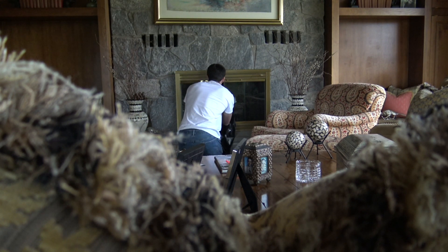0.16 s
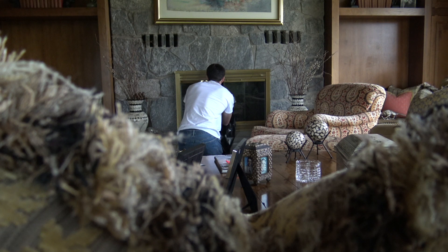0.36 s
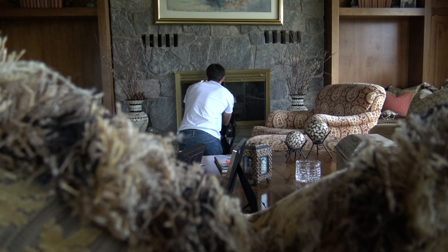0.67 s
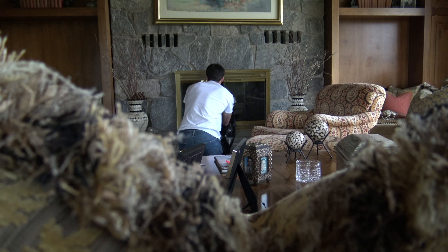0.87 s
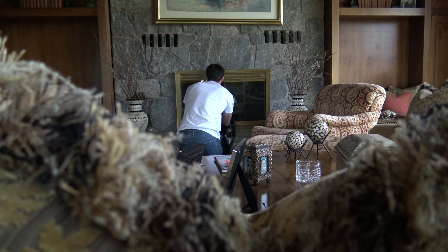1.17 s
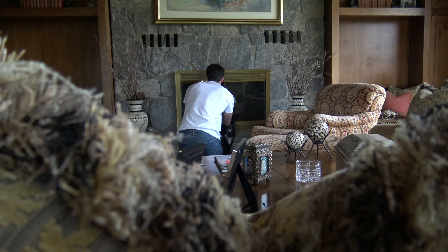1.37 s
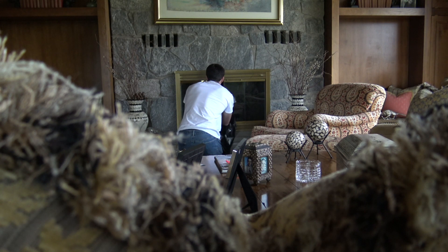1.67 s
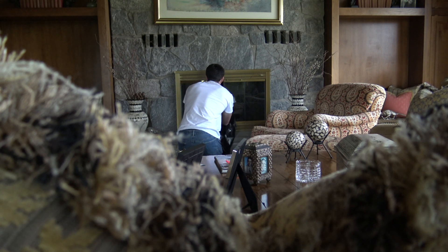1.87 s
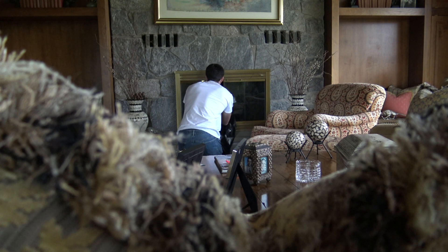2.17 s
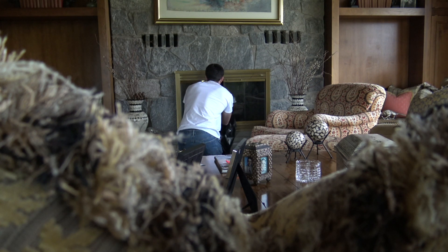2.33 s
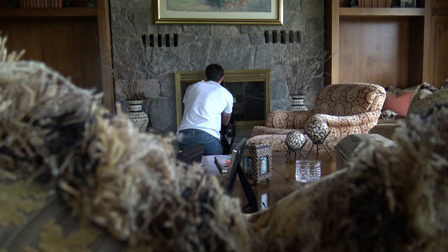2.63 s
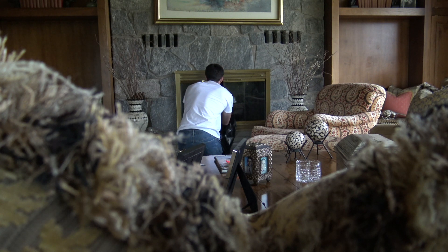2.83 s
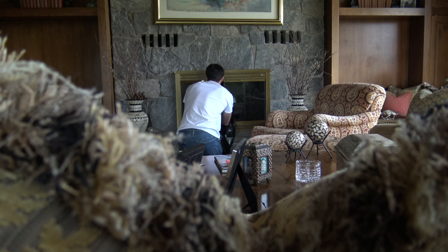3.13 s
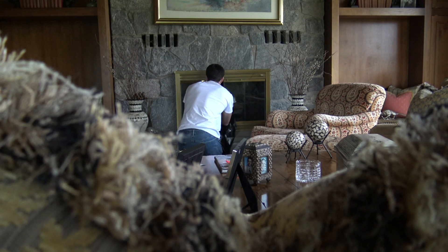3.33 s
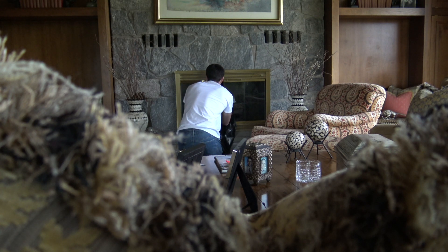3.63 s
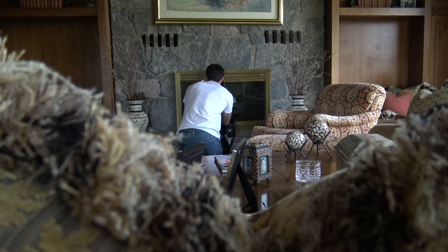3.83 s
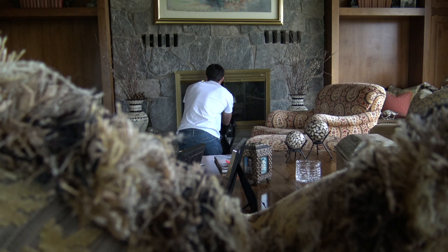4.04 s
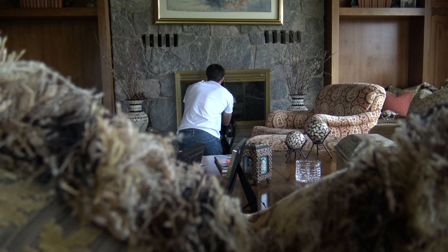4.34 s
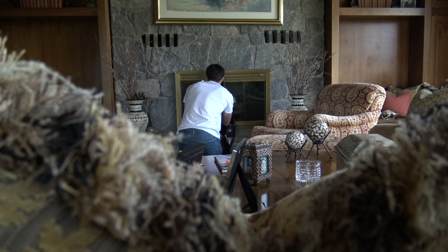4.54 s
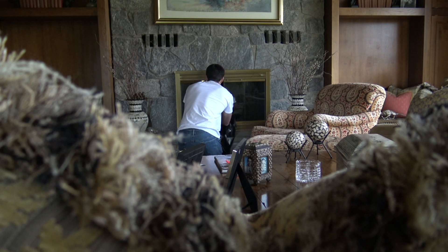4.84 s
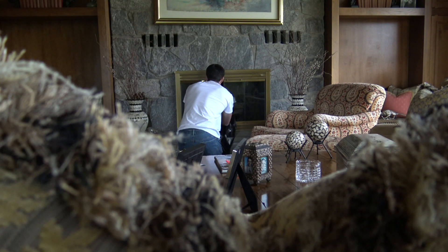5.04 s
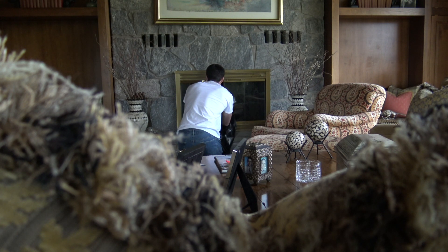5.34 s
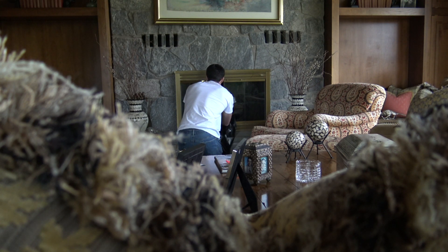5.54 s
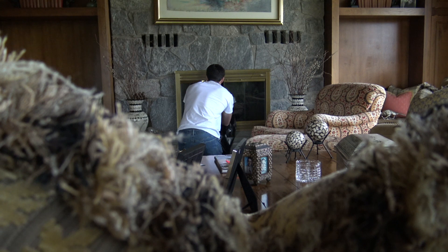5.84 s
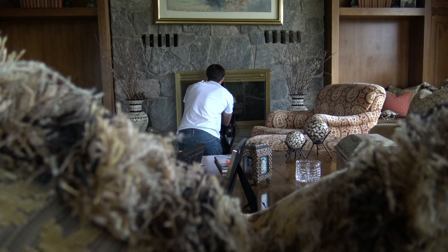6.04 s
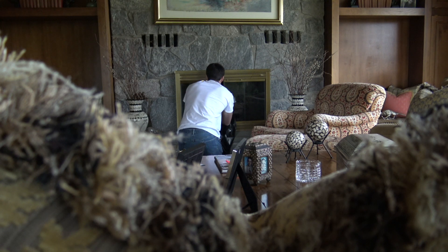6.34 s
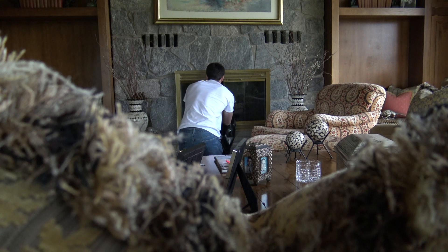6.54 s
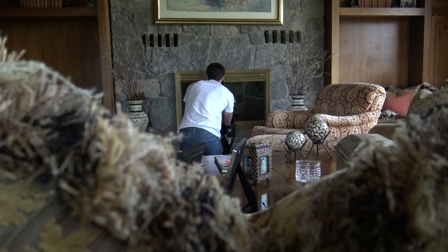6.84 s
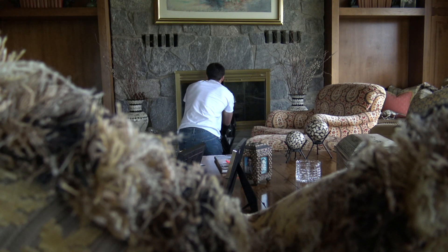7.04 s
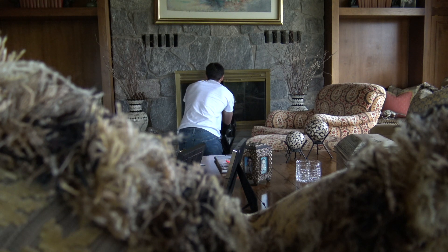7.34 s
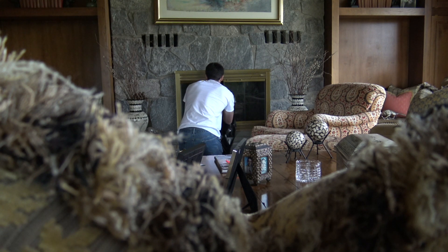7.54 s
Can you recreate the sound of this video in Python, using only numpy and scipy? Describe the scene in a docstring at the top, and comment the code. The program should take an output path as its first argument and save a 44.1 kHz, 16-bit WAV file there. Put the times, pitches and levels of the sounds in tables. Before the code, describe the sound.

Across a hard, echoing living room, someone tugs at the metal-framed glass doors of a fireplace. A short burst of bright clacking slams opens, a longer, harder, fairly regular bout follows, then quiet room hum, and two lighter rattles near the end. Panes ring, frames chatter and the hollow firebox booms beneath. Microphones stand a few meters away.

```python
"""Someone tugs at the metal-framed glass doors of a fireplace, across a live living room.
A short first bout of slams opens over a quiet hum and hiss; a longer, harder bout follows, then two lighter
returns. Each slam is a scatter of metal clicks through steel modes, with ringing panes and a booming firebox.
Before it, rubbing noise swells in the track; around and between slams the panes bump in their frames.
Echoes and a diffuse tail place the doors in the room."""
import sys
import numpy as np
from scipy import signal
from scipy.fft import rfft, irfft, next_fast_len
from scipy.io import wavfile
from scipy.ndimage import uniform_filter1d

SR = 44100
rng = np.random.default_rng(int(sys.argv[2]) if len(sys.argv) > 2 else 0)


def wav_out(sig):
    """Save sig, one row per channel (or a flat mono array), as 16-bit PCM at SR to the path in sys.argv[1]."""
    wavfile.write(sys.argv[1], SR, np.round(np.clip(np.atleast_2d(sig).T, -1, 1) * 32767).astype(np.int16))


N = 339570  # 7.7 s


def amp(db):
    """Decibels to gain."""
    return 10 ** (np.asarray(db) / 20)


def unit(x):
    """Scale to rms 1."""
    return x / np.sqrt(np.mean(x ** 2) + 1e-20)


def norm(x):
    """Scale to energy 1."""
    return x / np.sqrt(np.sum(x ** 2) + 1e-20)


def along(points, hz):
    """Read a curve of (Hz, value) points on a log frequency axis."""
    point_hz, values = np.transpose(points)
    return np.interp(np.log(hz + 1), np.log(point_hz + 1), values)


def filtered(x, response):
    """Shape a sound with a frequency response."""
    n = x.shape[-1]
    padded = next_fast_len(n + SR // 2)
    spectrum = rfft(x, padded) * response(np.fft.rfftfreq(padded, 1 / SR))
    return irfft(spectrum, padded)[..., :n]


def through(x, kernel):
    """Convolve a track with an impulse response."""
    return signal.fftconvolve(x, kernel)[:N]


def add(track, s, sound):
    """Mix a sound into a track at time s, in seconds."""
    start = min(max(round(s * SR), 0), len(track))
    track[start:start + len(sound)] += sound[:len(track) - start]


# Steady room tone. Each row: frequency in Hz, relative density in dB per Hz.
AIR_SPECTRUM = [(25, -5), (60, 0), (100, -0.5), (150, -5), (215, -3), (280, -5.5), (380, -8), (520, -12),
                (720, -15.5), (930, -7), (1150, -10), (1500, -21), (4000, -24.5), (16000, -28)]
# Side share of the room tone. Each row: frequency in Hz, side level against the middle in dB.
AIR_SIDE = [(60, -24.5), (200, -10.5), (1300, -14), (10000, -15)]
AIR_DB = -57.5  # rms of the middle signal, dB re full scale


def room_tone():
    """Steady ventilation and hiss: shaped noise, nearly alike on both sides."""
    noise = rng.standard_normal((2, N))
    mid, side = unit(filtered(noise, lambda hz: amp(along(AIR_SPECTRUM, hz))))
    side = filtered(side, lambda hz: amp(along(AIR_SIDE, hz)))
    return amp(AIR_DB) * np.array([mid + side, mid - side])


# How long the room rings on. Each row: frequency in Hz, time to fall by 60 dB in seconds.
ROOM_DECAY = [(50, 1.6), (160, 1), (420, 0.68), (1100, 0.75), (3000, 0.65), (7000, 0.77), (14000, 0.65)]
# Direct path, floor bounce and first echoes. Each row: delay in seconds, relative gain.
EARLY_ECHOES = [(0, .8), (.0034, .45), (.0078, 1.1), (.0096, .8), (.0142, .9), (.0167, .6), (.0205, .45)]


def room(x, tail_db, build_s, count=5):
    """Hard echoes from stone and shelves, then a diffuse tail that builds up and dies band by band."""
    hz, t, bands = signal.stft(rng.standard_normal((count, SR)), SR, nperseg=256)
    decay = amp(-60 * t / along(ROOM_DECAY, hz)[:, None])
    build = 1 - np.exp(-t / build_s)
    tails = signal.istft(bands * decay * build, SR, nperseg=256)[1]
    # the tail starts only once the sound has reached the nearest wall
    tails = np.pad(tails, ((0, 0), (round(.004 * SR), 0)))
    # every 2 ms the contacts land on a random spot of the doors, with its own paths through the room
    spot = rng.integers(count, size=N)[np.arange(N) // round(.002 * SR)]
    diffuse = sum(through(x * (spot == k), norm(tail)) for k, tail in enumerate(tails))
    early = np.zeros(SR // 20)
    for s, gain in EARLY_ECHOES:
        add(early, s, np.array([gain]))
    return (through(x, norm(early)) + amp(tail_db) * diffuse) / np.hypot(1, amp(tail_db))


def ring(modes):
    """Impulse response of damped modes: wider ones die faster, and dB sets the height of each peak."""
    t = np.arange(SR // 2) / SR
    total = np.zeros(len(t))
    for k, (hz, width, db) in enumerate(modes):
        decay = np.exp(-np.pi * width * t)
        total += (-1) ** k * amp(db) * width * decay * np.cos(2 * np.pi * hz * t)
    return norm(total)


def click(spectrum, tilt_db, smear, size=2048):
    """One contact: a causal click, tilted in colour and smeared by its many paths along the frame."""
    hz = np.fft.rfftfreq(size, 1 / SR)
    octaves = np.log2(np.maximum(hz, 1000) / 3000)  # the tilt pivots at 3 kHz and is flat below 1 kHz
    # folding the cepstrum gives minimum phase: the energy comes first
    cepstrum = irfft(np.log(amp(along(spectrum, hz) + tilt_db * octaves)))
    cepstrum[1:size // 2] *= 2
    cepstrum[size // 2 + 1:] = 0
    # each frequency gets its own random delay
    delay = smear * np.abs(unit(uniform_filter1d(rng.standard_normal(len(hz)), size=12)))
    phase = 2 * np.pi * hz[1] * np.cumsum(delay)
    return norm(irfft(np.exp(rfft(cepstrum) - 1j * phase))[:size // 2])


def contacts(life, rate, rebound_db, spread_db):
    """A first push, then a scatter of rebounds of uneven size that swells and dies; energy 1."""
    t = np.arange(SR // 3) / SR
    chance, size = rng.random(len(t)), rng.standard_normal(len(t))
    sign = rng.choice([-1, 1], len(t))
    level = t * amp(spread_db * size - 60 * t / max(life, .02))
    rebounds = norm((chance < rate / SR) * sign * level)
    return norm((t == 0) + amp(rebound_db) * rebounds)


def pushes():
    """What each slam hands on to the glass and the firebox: (s, dB), strength plus door weight."""
    return [(s, db + weight_db) for s, db, weight_db, _, _ in SLAMS]


REST_S = .6  # a door left alone longer than this has come to rest


def run_ups(from_rest):
    """The slams after the first that come out of rest, or else those of a door still swinging: (s, dB)."""
    rows = pushes()
    return [(s, db) for (last, _), (s, db) in zip(rows, rows[1:]) if (s - last > REST_S) == from_rest]


# Firebox resonances. Each row: frequency in Hz, width in Hz, relative peak in dB.
FIREBOX_MODES = [(36, 14, -4.5), (64, 16, -5), (122.4, 20, -2), (183.5, 14.2, -2), (198.4, 24, -2),
                 (261.5, 23, 3.5), (338.3, 38, 4.5), (406.5, 110, -4)]
# Dull shifts of weight on the hearth. Each row: start in seconds, relative level in dB.
HEARTH_SHIFTS = [(2.462, -42.5), (4.295, -44), (4.52, -44.5), (7.682, -54)]
THUD_DB, THUD_GROWS = 15, 0.79  # firebox gain in dB; its dB per dB of push


def thuds():
    """The hollow firebox booms under every slam and shift of weight."""
    force = np.zeros(N)
    for s, db in pushes():
        blow = contacts(.09, rate=800, rebound_db=-4.5, spread_db=5.0)
        add(force, s, amp(THUD_GROWS * db + THUD_DB) * blow)
    for s, db in HEARTH_SHIFTS:
        add(force, s, amp(db + 28.5) * contacts(0.08, rate=1100, rebound_db=-1.5, spread_db=5))
    return through(room(force, tail_db=0.5, build_s=0.0068), ring(FIREBOX_MODES))


# A loose pane bumps hard in its frame. Each row: start in seconds, relative pane and frame levels in dB.
HARD_BUMPS = [(.319, -27, -26.5), (.415, -19, -41.5), (1.378, -26.5, -33), (1.465, -24, -47.5),
              (1.607, -23, -23.5), (1.833, -24, -23), (3.095, -26.5, -42.5), (3.15, -20.5, -42.5),
              (4.295, -43, -54.5), (7.304, -32, -45), (7.675, -53, -57)]
# The soft bumps around a slam: seconds before or after it, and dB added to its push.
SLACK_S, SLACK_DB = .014, -15  # the pane seats itself before the slam
SWING_S, SWING_DB = .135, -23.5  # the door falls back after it
SOFT_FRAME_DB = -37.5  # the frame's share of both


def bumps():
    """The hard bumps, and soft ones before and after the slams: (s, pane dB, frame dB)."""
    slack = [(s - SLACK_S, db + SLACK_DB, db + SOFT_FRAME_DB) for s, db in run_ups(from_rest=False)]
    swing = [(s + SWING_S, db + SWING_DB, db + SOFT_FRAME_DB) for s, db in pushes()]
    return list(HARD_BUMPS) + slack + swing


# Resonances of the glass panes. Each row: frequency in Hz, width in Hz, relative peak in dB.
PANE_MODES = [(474.4, 49, -10), (522.4, 42, 0), (587, 35, 2), (623.3, 28, -5), (723, 35, -4.5),
              (875, 20, -11), (940, 51, -10), (1098, 100, -16.5), (1456, 32, -6.5)]
# Resonances of the frames around them. Each row: frequency in Hz, width in Hz, relative peak in dB.
FRAME_MODES = [(1604, 35, 2.5), (1496, 50, 6), (1580, 50, -23.5), (1657, 89, -12), (1964, 60, -11.5),
               (4800, 190, -17)]
PANE_DB = 20.5  # gain from a slam's push to the glass


def knocks():
    """Slams ring the glass panes; bumps ring the panes and their frames."""
    pane, frame = np.zeros((2, N))
    for s, db in pushes():
        add(pane, s, amp(db + PANE_DB) * contacts(0.066, rate=900, rebound_db=-0.5, spread_db=-1.0))
    for s, pane_db, frame_db in bumps():
        pane_blow = contacts(0.12, rate=1000, rebound_db=-6.0, spread_db=0.5)
        frame_blow = contacts(0.064, rate=1000, rebound_db=2, spread_db=8.0)
        add(pane, s, amp(pane_db + 27.5) * pane_blow)
        add(frame, s, amp(frame_db + 22.5) * frame_blow)
    glass = through(room(pane, tail_db=-2.0, build_s=0.004), ring(PANE_MODES))
    return glass + through(room(frame, tail_db=-10.5, build_s=0.0086), ring(FRAME_MODES))


# Colour of metal on metal. Each row: frequency in Hz, relative density in dB per Hz.
METAL_SPECTRUM = [(100, -28), (400, -20.5), (800, -2), (1100, 1), (2000, 2.5), (3200, -2), (3750, -5.5),
                  (5000, -4), (7000, -8.5), (10000, -11), (12000, -17.5), (16000, -31.5)]
# Length in seconds and dB added to the slam's push.
CREEP_S, CREEP_DB = .13, -37  # out of rest the door first creeps along its track
RUSH_S, RUSH_DB = 0.015, -21  # a door still swinging makes a last rush


def slides():
    """Metal rubs in the track before a slam: noise that grows as the door gathers speed."""
    track = np.zeros(N)
    creeps = [(s, CREEP_S, db + CREEP_DB) for s, db in run_ups(from_rest=True)]
    rushes = [(s, RUSH_S, db + RUSH_DB) for s, db in run_ups(from_rest=False)]
    for end, length, db in creeps + rushes:
        speed = np.linspace(0, 1, max(round(length * SR), 2))
        add(track, end - length, amp(db) * speed * rng.standard_normal(len(speed)))
    return through(track, click(METAL_SPECTRUM, tilt_db=4, smear=0))


# Steel frame modes. Each row: frequency in Hz, width in Hz, peak against the plain contact in dB.
STEEL_MODES = [(1412, 65, -1), (1555, 69, -10), (1850, 31, -11), (2010, 10, -8.5), (1980, 100, -7.5),
               (2150, 12, -22.5), (2680, 44, -11), (2890, 37, -5), (2960, 120, -11), (3020, 19, -5.5),
               (3745, 25, -9), (3390, 40, -28), (4130, 70, -1.5), (4550, 91, -6), (5250, 60, -5.5),
               (6310, 44, 0.5)]


def steel_ring(hz):
    """The steel frames pass every contact and add their own narrow modes."""
    response = 1
    for mode, width, db in STEEL_MODES:
        damping = 1j * hz * width
        response = response + amp(db) * damping / (mode ** 2 - hz ** 2 + damping)
    return response


# The spring catch. Each row: frequency in Hz, width in Hz, relative peak in dB.
CATCH_MODES = [(2088, 1000, -6.5), (3450, 500, 1)]
# A door hits its stop. Each row: start in seconds, relative strength in dB, door weight behind the blow in dB,
# chatter life in seconds (a 60 dB fall, at least 20 ms), brightness in dB per octave.
SLAMS = [(0.0004, -26, 3, .02, 2), (0.1802, -15, 2, .13, -0.5), (0.3187, -24, -2, .05, 4),
         (0.4353, -7, -1.5, .05, 0.5), (0.4772, -23, -2, 0.051, 4), (1.214, -8.5, -10.5, 0.013, 1),
         (1.248, -14, 2, .046, 0), (1.4834, -6.5, -2.5, .02, 1), (1.7031, -14.5, 4.5, .087, 1),
         (1.9166, -6.5, -2.5, .02, 1), (2.2487, -22.5, 0.5, .03, -0.5), (2.9533, -13.5, -1, 0.023, .5),
         (3.1627, -7.5, -1, .033, .5), (3.378, -7.5, -2, .027, .5), (3.5963, -7, -0.5, .05, 1),
         (3.8182, -8.5, -1.5, .05, .5), (4.0261, -13.5, 0, .023, 0), (6.3187, -26, -1.5, .14, -2),
         (7.3045, -31.5, 7.5, .15, 1), (7.397, -26, -2, .065, -1.5)]


def clashes():
    """Catch snaps, frame chatter, loose ticks and track slides, all rung through the steel."""
    track = np.zeros(N)
    catch = ring(CATCH_MODES)[:SR // 50]
    for s, db, _, life, tilt_db in SLAMS:
        blow = contacts(life, rate=2000, rebound_db=0.0, spread_db=0.5)
        ticks = contacts(.16, rate=110, rebound_db=8.0, spread_db=3.5)
        contact = click(METAL_SPECTRUM, tilt_db, smear=.002)
        add(track, s, amp(db + 19.5) * signal.fftconvolve(blow + amp(-15.5) * ticks, contact))
        snap = contacts(0.013, rate=2500, rebound_db=2.0, spread_db=1.5)
        add(track, s, amp(db + 14.0) * signal.fftconvolve(snap, catch))
    return filtered(room(track + slides(), tail_db=2.5, build_s=0.0089), steel_ring)


# Side share of the doors. Each row: frequency in Hz, side level against the middle in dB.
DOOR_SIDE = [(60, -31.5), (200, -22.5), (1200, -22), (3000, -37), (10000, -93.5)]
# Left minus right at the microphones. Each row: frequency in Hz, difference in dB.
LEFT_LEAN = [(40, .4), (170, 1.6), (350, .2), (700, -1.4), (1300, -3), (2600, -.7), (5000, 0)]


def scene():
    """The doors over the room tone, heard by two closely spaced microphones."""
    heard = clashes() + knocks() + thuds()
    # sound arriving from the side differs between the microphones by a quarter turn
    side = filtered(heard, lambda hz: 1j * amp(along(DOOR_SIDE, hz)))
    pair = np.array([heard + side, heard - side])
    doors = filtered(pair, lambda hz: amp(np.outer([.5, -.5], along(LEFT_LEAN, hz))))
    return doors + room_tone()


TOP_HZ = 16000


def record(dry):
    """A sharp band limit: nothing from TOP_HZ up is kept."""
    return filtered(dry, lambda hz: hz < TOP_HZ)


dry = scene()
out = record(dry)
wav_out(out)
```